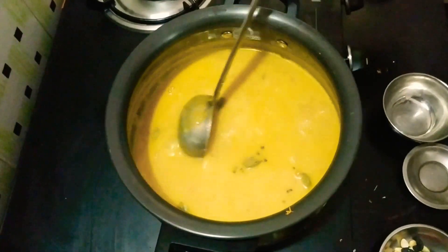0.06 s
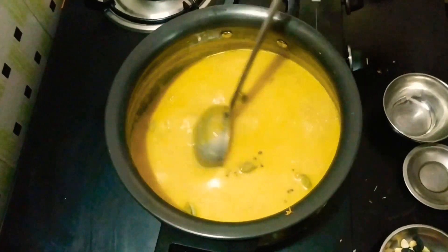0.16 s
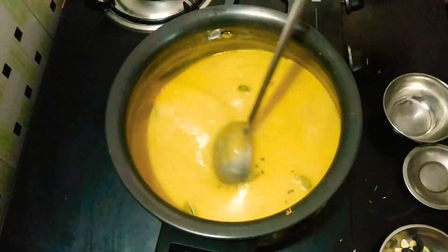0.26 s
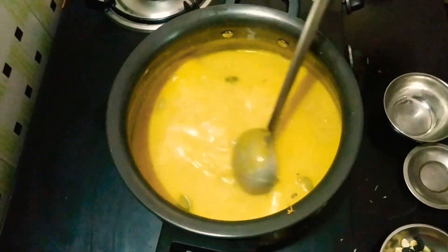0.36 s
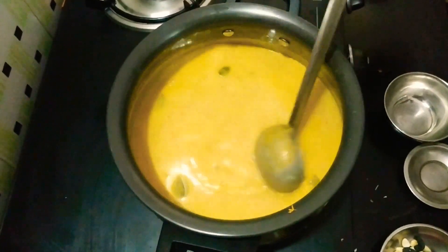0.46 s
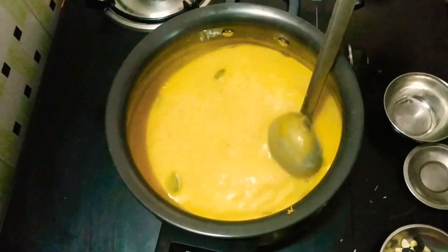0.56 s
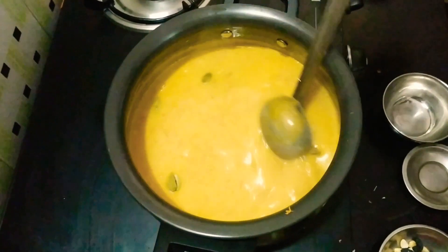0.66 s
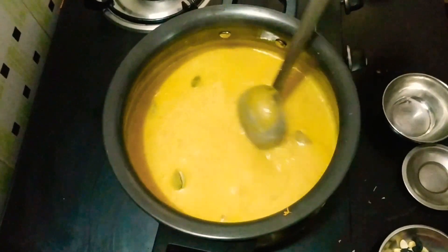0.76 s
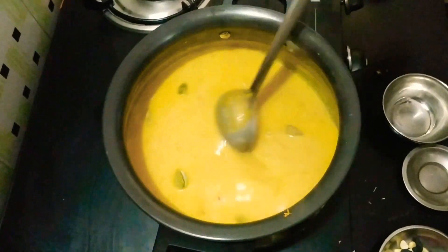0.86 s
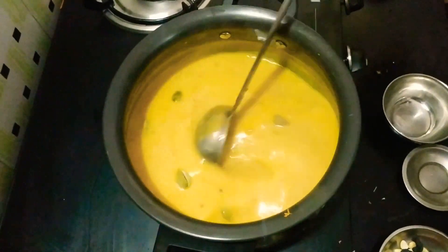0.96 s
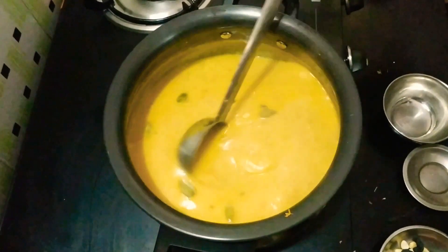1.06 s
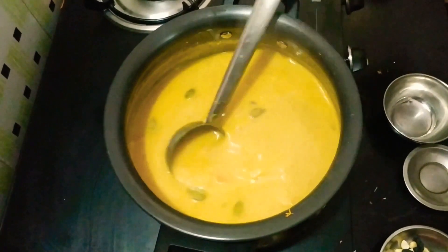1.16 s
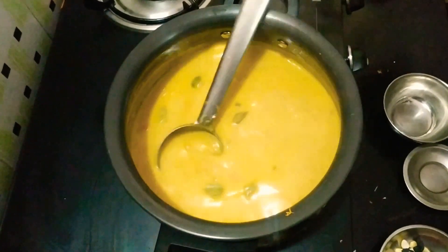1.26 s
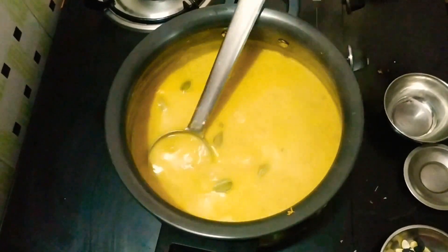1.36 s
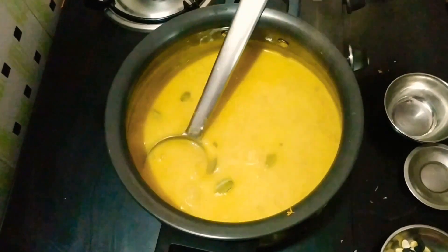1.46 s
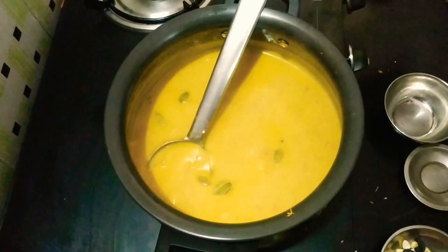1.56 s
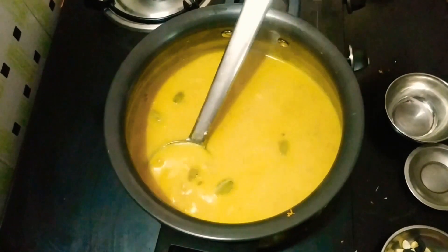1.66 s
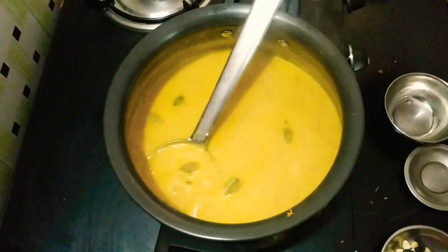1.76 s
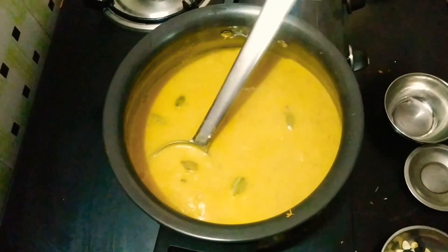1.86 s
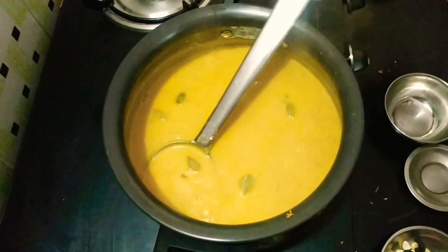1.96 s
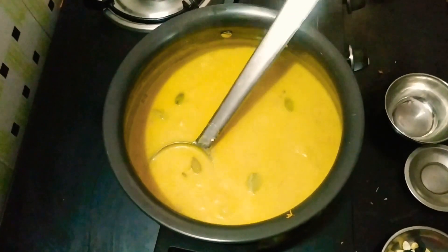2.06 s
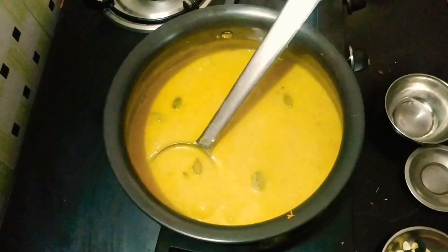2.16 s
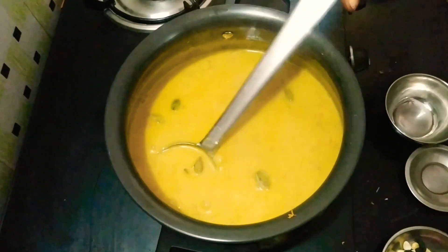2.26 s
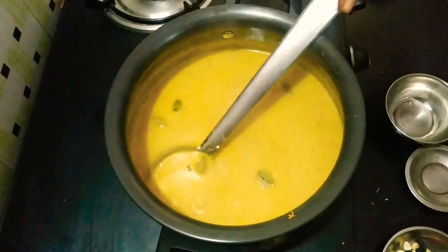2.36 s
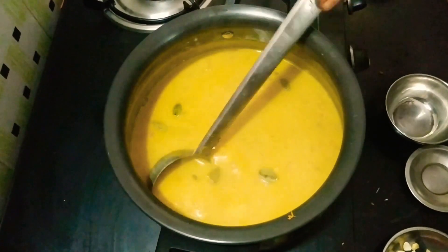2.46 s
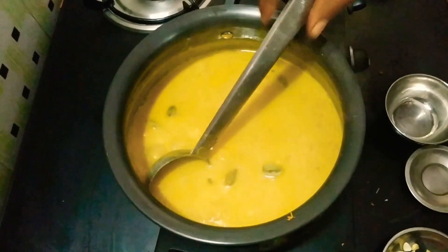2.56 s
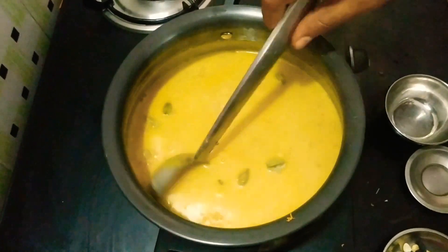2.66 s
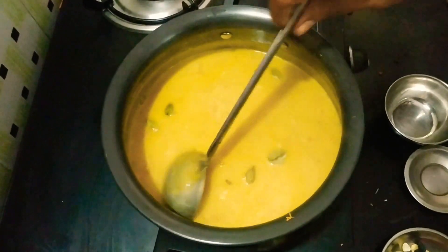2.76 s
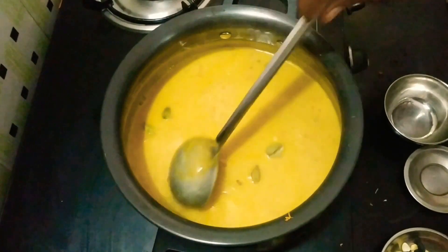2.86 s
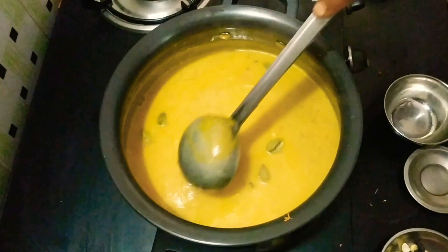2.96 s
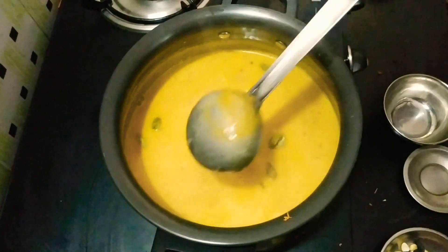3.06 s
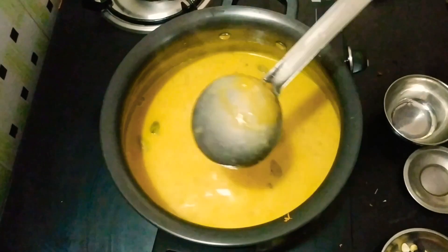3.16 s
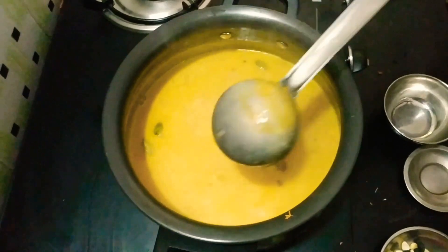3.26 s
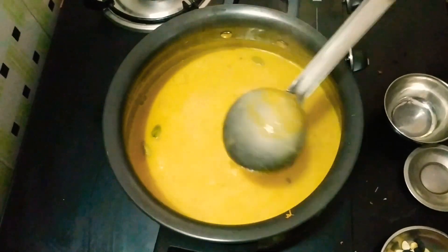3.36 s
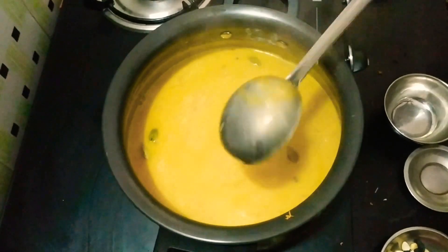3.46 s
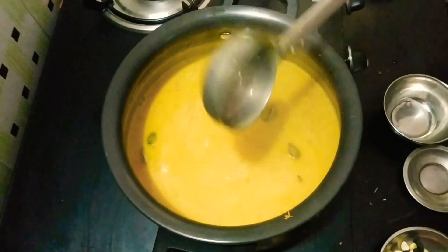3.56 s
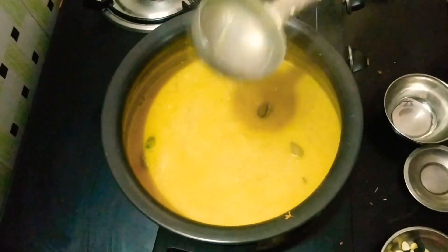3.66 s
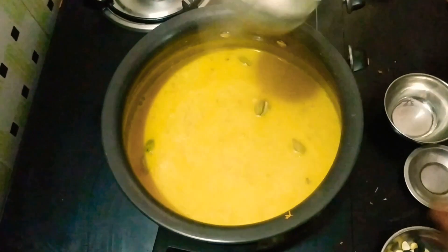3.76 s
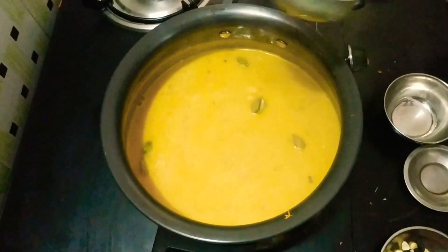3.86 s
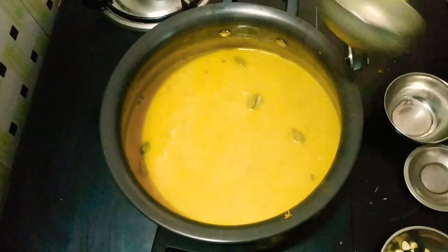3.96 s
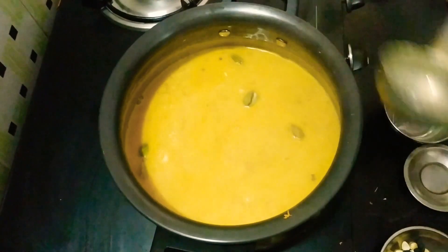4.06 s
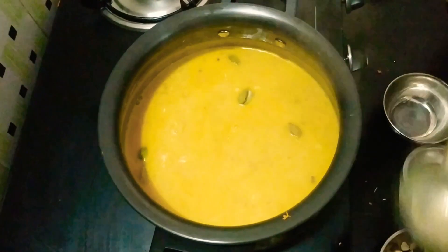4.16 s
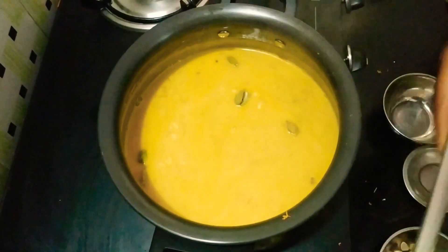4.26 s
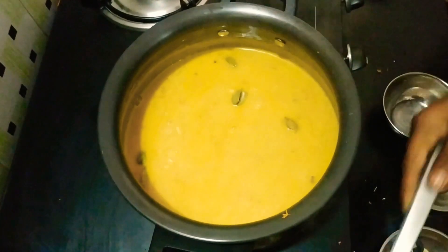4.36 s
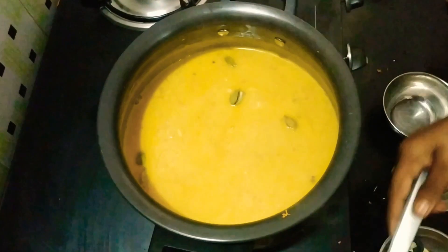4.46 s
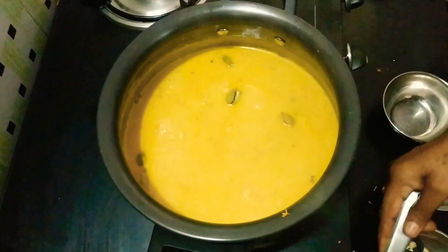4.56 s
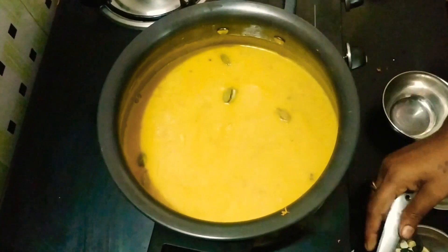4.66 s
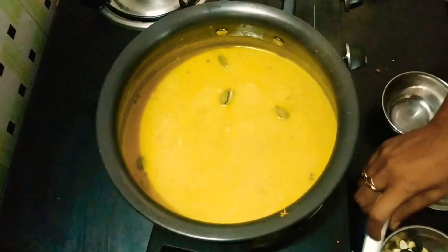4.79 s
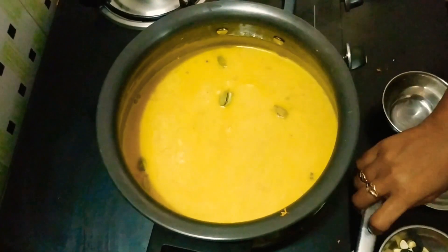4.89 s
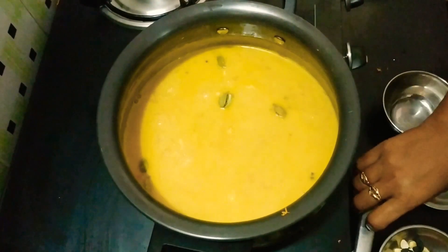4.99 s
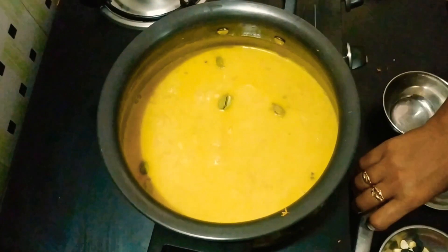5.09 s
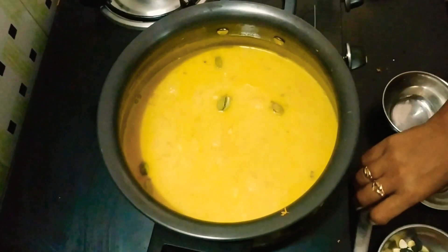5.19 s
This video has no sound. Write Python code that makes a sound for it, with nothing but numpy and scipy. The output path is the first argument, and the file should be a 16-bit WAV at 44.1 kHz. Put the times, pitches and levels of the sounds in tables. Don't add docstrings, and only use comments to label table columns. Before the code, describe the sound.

A steel ladle thumps and drags inside a full soup pot, clinks and grates on the rim, then clatters onto a kitchen counter.

```python
import sys
import numpy as np
from scipy import signal
from scipy.fft import rfft, irfft
from scipy.io import wavfile
from scipy.ndimage import uniform_filter1d

SR = 44100
rng = np.random.default_rng(int(sys.argv[2]) if len(sys.argv) > 2 else 0)


def transcribe(u):
    v = np.clip(np.atleast_2d(u).T, -1, 1)
    q = np.round(v * 32767).astype(np.int16)
    wavfile.write(sys.argv[1], SR, q)


def level_to_linear(level):
    exponent = np.asarray(level, float) / 20
    return 10 ** exponent


N = 230476

# start [s], level [dB], tick [dB], sharpness [0-1], wall wash [dB].
THUMP_BLOWS = [(0.005, -50, -64, 0.1, -80.5), (0.456, -33.5, -61, 0.51, -46), (0.535, -50, -45, 0.04, -47),
               (0.795, -31, -14.5, 0.98, -49), (0.829, -32, -50, 0.45, -31.5),
               (0.908, -35, -29.5, 0.92, -34.5), (0.925, -44.5, -61, 0.64, -68),
               (1.044, -50, -51, 0.4, -46.5), (1.101, -50.5, -56, 0.6, -52), (1.176, -48, -39, 0.44, -47.5),
               (1.259, -52, -48, 0.2, -51), (1.367, -33, -49, 0.62, -47.5), (1.41, -37, -51, 0.65, -47.5),
               (1.503, -33.5, -18, 0.77, -31), (1.522, -31.5, -26, 0.27, -32.5),
               (1.57, -34, -40, 0.57, -41), (2.726, -38.5, -26.5, 0.99, -39), (.803, -36, -60, 0.38, -57),
               (1.546, -42.5, -60, 0.14, -36), (1.6, -44, -60, 0.3, -48), (2.417, -54.5, -70, 0.25, -54),
               (2.449, -51.5, -70, 0.8, -56), (2.65, -53, -71, 0.37, -67), (2.733, -43, -62, 0.44, -64),
               (2.875, -62, -42, 0.96, -53)]
# frequency [Hz], level [dB], t60 [s].
COUNTER_MODES = [(209, 10, 0.12), (289, -7, 0.27), (380, 11, 0.056), (480, -23, 0.15), (690, -12, 0.097),
                 (970, 5.5, 0.018), (3610, 9.5, 0.031), (1610, 7, 0.016), (2340, 5, 0.054),
                 (3540, -18, 0.27)]


def evened(x):
    return x / np.sqrt(np.mean(x ** 2) + 1e-20)


def peaked(x):
    return x / abs(x).max()


def read(points, hz):
    f, value = np.transpose(points)
    return np.interp(np.log(hz + 1), np.log(f + 1), value)


def add(mix, s, sound):
    part = mix[:, round(s * SR):][:, :sound.shape[1]]
    part += sound[:, :part.shape[1]]


def above(x, hz):
    return signal.sosfilt(signal.butter(2, hz, "high", fs=SR, output="sos"), x)


def ring(modes, scatter_db=0, size=15000, wide=1):
    hz, db, t60 = np.transpose(modes)[:, :, None]
    t = np.arange(size) / SR
    level, phase, share = rng.standard_normal((3, len(hz), 1))
    apart = wide * np.minimum(hz / 1000, 1) ** 2
    swing = level_to_linear(db + scatter_db * level - 60 * t / np.clip(t60, .01, .7))
    ports = []
    for side in (1, -1):
        wave = np.sin(2 * np.pi * hz * t + side * 1.13 * apart * phase)
        ports.append((swing * level_to_linear(side * 2.6 * apart * share) * wave).sum(0))
    return np.array(ports)


def struck(body, contact_s):
    t = np.arange(SR // 20) / SR
    chatter = rng.standard_normal(len(t)) * t * np.exp(-t / contact_s)
    return peaked(signal.fftconvolve(body, chatter[None], axes=1))


def crack(decay_s, low_hz, high_hz, rise_s=0.00038):
    t = np.arange(SR // 8) / SR
    band = signal.butter(2, [low_hz, min(high_hz, .45 * SR)], "band", fs=SR, output="sos")
    noise = evened(signal.sosfilt(band, rng.standard_normal((2, len(t)))))
    return noise * np.exp(-t / decay_s) * np.minimum(t / rise_s, 1)


def span(strokes):
    return np.arange(max(strokes[0][0] - .15, 0), sum(strokes[-1][:2]) + .35, 1 / SR)


def effort(strokes, t, rise_db_s):
    s, hold, db, fall = np.transpose(strokes)[:, :, None]
    before = np.maximum(s - t, 0)
    after = np.maximum(t - s - hold, 0)
    return level_to_linear(db - rise_db_s * before - abs(fall) * after).sum(0)


def slips(count, per_s, spread_db):
    chance, size, sign = rng.random((3, count))
    clicks = (chance < per_s / SR) * level_to_linear(-spread_db * np.log(size + 0.0046))
    return evened(clicks * np.sign(sign - .5))


def rubbed(mix, strokes, peaks, per_s, spread_db, rise_db_s, split_hz=0, low=None, sag_per_s=0):
    t = span(strokes)
    force = slips(len(t), per_s, spread_db) * signal.windows.tukey(len(t), .05)
    modes = np.array([(hz, level + 10 * np.log10(width), np.log(1000) / np.pi / width)
                      for hz, width, level in peaks])
    hz = modes[:, 0]
    sag_under_hz = 2300 if sag_per_s else 0
    parts = [(hz >= split_hz, strokes, 0),
             ((hz < split_hz) & (hz >= sag_under_hz), low, 0),
             (hz < sag_under_hz, low, sag_per_s)]
    for part, rows, drop in parts:
        if not part.any():
            continue
        body = ring(modes[part], size=6000, wide=1 if hz[part].max() > 4500 else .5)
        body *= np.minimum(np.arange(6000) / 25, 1)
        drive = force * effort(rows, t, rise_db_s)
        sound = signal.fftconvolve(drive[None], body / np.linalg.norm(body) * np.sqrt(2), axes=1)
        clock = t[0] + np.arange(sound.shape[1]) / SR
        slowed = clock - drop / 2 * np.maximum(clock - rows[0][0], 0) ** 2
        add(mix, t[0], np.array([np.interp(slowed, clock, port) for port in sound]))


def brushed(mix, groups, colour, per_s, spread_db, rise_db_s):
    taps = np.fft.fftshift(irfft(level_to_linear(read(colour, np.fft.rfftfreq(512, 1 / SR)))))
    for strokes in groups:
        t = span(strokes)
        grit = np.array([slips(len(t), per_s, spread_db) for port in "LR"])
        grit = evened(signal.fftconvolve(grit, taps[None], "same", axes=1))
        add(mix, t[0], effort(strokes, t, rise_db_s) * grit)


def fine(low_hz, high_hz, width, db, count=70):
    place, size = rng.random((2, count))
    hz = low_hz + (high_hz - low_hz) * (np.arange(count) + place) / count
    return [(f, width, db - 10 * q) for f, q in zip(hz, size)]


def widened(peaks):
    return [(hz, max(width, 42), db + 10 * np.log10(max(width, 42) / 60)) for hz, width, db in peaks]


def room_hum():
    # frequency [Hz], density [dB per Hz].
    hum_colour = [(12, -31), (20, 1), (60, -22.5), (100, -10), (216, -26.5), (300, -20), (1200, -33),
                  (16000, -39)]
    # frequency [Hz], left-right likeness [-1 to 1].
    likeness = [(60, 0.96), (180, 0.99), (550, 0.81), (1650, -0.38), (4970, 0.13), (15000, -0.088)]
    # frequency [Hz], width [Hz], level [dB].
    room_tones = [
        (82.4, 5.9, -70),
        (182.5, 8.3, -72),
        (290.5, 8.5, -73.5),
        (384, 38, -78),
    ]
    # start [s], hold [s], level [dB], fall [dB per s].
    footfalls = [
        (2.428, 0.16, -46, 104),
        (4.4, 0.065, -46.5, 200),
        (5.038, 0.045, -36, 150),
    ]
    frames, hz = N // 512 + 5, np.fft.rfftfreq(2048, 1 / SR)[:, None]
    a, b, c, d, patches = rng.standard_normal((frames, 1025, 5)).T
    patches = evened(uniform_filter1d(uniform_filter1d(patches, 20, axis=0), 8, axis=1))
    same, left = np.clip(read(likeness, hz), -1, 1), a + 1j * b
    z = np.array([left, same * left + np.sqrt(1 - same ** 2) * (c + 1j * d)])

    def wave(size):
        return evened(signal.istft(z * size, nperseg=2048, noverlap=1536)[1][:, :N])

    noise = level_to_linear(-54.5) * wave(level_to_linear(read(hum_colour, hz) + patches))
    tones = [level_to_linear(db) * wave(1 / (1 + (2 * (hz - f) / width) ** 4)) for f, width, db in room_tones]
    blows = [(s + 0.021, 0, db - 16, 138) for s, db, *rest in THUMP_BLOWS]
    shake = level_to_linear(-50) + effort(blows + footfalls, np.arange(N) / SR, rise_db_s=193)
    return noise + tones[0] * shake * level_to_linear(54.0) + sum(tones[1:])


def steel_touches():
    # start [s], level [dB], first mode [Hz], second mode [Hz], tick [dB].
    touches = [(0.535, -80, 7960, 10500, -38.5), (2.7, -57, 2700, 3100, -74),
               (2.7249, -61, 7860, 10500, -33.5), (2.98, -57.5, 7880, 13640, -49),
               (3.391, -72, 9440, 14500, -53), (3.451, -81, 5000, 8200, -58), (3.699, -72, 3800, 2863, -61),
               (3.725, -65, 11600, 13400, -60.5), (3.757, -71.5, 7490, 6880, -69),
               (4.689, -71.5, 9770, 3710, -58.5), (4.87, -77, 7000, 8600, -57),
               (5.112, -74, 4430, 4420, -57.5), (0.002, -60.5, 10000, 7730, -58),
               (0.044, -67, 12100, 9440, -58)]
    lift_s, wet_t60, free_t60 = 3.42, 0.054, 1
    mix = np.zeros((2, N))
    for s, db, first_hz, second_hz, tick_db in touches:
        t60 = wet_t60 if s < lift_s else free_t60
        pairs = [(hz * split, 0, t60) for hz in (first_hz, second_hz) for split in (.994, 1.005)]
        body = ring(pairs, scatter_db=-2.0, size=10000, wide=0.66)
        add(mix, s, level_to_linear(db + 13.5) * struck(body, 0.004))
        add(mix, s, level_to_linear(tick_db) * crack(t60 / 12, 2800, 19000))
    return mix


def pot_thumps():
    # frequency [Hz], level [dB], t60 [s].
    pot_modes = [(85.5, -2, 0.8), (181.9, 3.5, 0.22), (222.6, -19, 0.98), (246.9, 0, 0.4), (289.8, 0, 0.13),
                 (349, -22, 0.2), (369.6, -1, 0.11), (444, -6.5, 0.13), (616, -2.5, 0.077),
                 (797, -17, 0.13), (1024, -12, 0.074), (1220, -22, 0.089), (1385, -2, 0.1),
                 (2150, -26, .08), (2700, -26, .08)]
    mix = np.zeros((2, N))
    for s, db, tick_db, sharp, wash_db in THUMP_BLOWS:
        push = signal.windows.hann(int(40 + 160 * (1 - np.clip(sharp, 0, 1))))
        thump = signal.fftconvolve(ring(pot_modes, scatter_db=1.9), push[None], axes=1)
        add(mix, s, level_to_linear(db + 4.0) * peaked(above(thump, 191)))
        add(mix, s, level_to_linear(tick_db - 1.5) * crack(0.00066, 720, 3620, rise_s=0.00047))
        wash = crack(0.024, 127, 2000)
        add(mix, s, level_to_linear(wash_db - 8.0) * (wash + 0.24 * wash[::-1]))
    return mix


def bottom_drag():
    # start [s], hold [s], level [dB], fall [dB per s].
    drags = [
        [(0.09, 0.009, -51.5, 81.5), (.19, 0.0088, -61.5, 80), (.31, 0.013, -59.5, 60),
         (0.534, 0.0013, -51, 151), (0.75, 0.072, -48, 58.3), (1.105, 0.0064, -54.5, 302),
         (1.15, 0.13, -66, 204), (1.378, 0.06, -62.5, 136)],
        [(2.4, 0.057, -60.5, 46.5), (2.7, 0.014, -64, 403), (2.784, 0.022, -61.5, 48.4)],
    ]
    # frequency [Hz], density [dB per Hz].
    drag_colour = [(880, -10), (1500, -6), (1610, -14), (2610, -2.5), (3480, -11.5), (5940, -12),
                   (14200, -19), (16000, -30)]
    mix = np.zeros((2, N))
    brushed(mix, drags, drag_colour, per_s=7000, spread_db=3.2, rise_db_s=132)
    return mix


def bottom_groans():
    # start [s], hold [s], level [dB], fall [dB per s].
    groans = [
        [(0.095, 0.018, -57.5, 60), (.2, 0.017, -60, 100), (.27, 0.034, -58.5, 120), (.378, .005, -66, 250)],
        [(0.812, 0.01, -49, 350), (.845, 0.018, -60, 300), (0.912, 0.0028, -49, 600)],
        [(2.845, 0.0098, -60, 200), (2.874, 0.014, -50.5, 250), (2.93, 0.019, -54.5, 200),
         (3.03, 0.033, -61, 160)],
    ]
    # frequency [Hz], width [Hz], level [dB].
    groan_modes = [
        [(854, 22, -1.5), (914, 19, -4), (998, 77, 3), (1047, 67, -1), (1195, 28, -8)],
        [(800, 90, -1), (1070, 120, -1), (1200, 140, 2), (1346, 55, 2), (1600, 110, -24)],
        [(526, 13, 2), (840, 230, -25), (990, 74, 15.5), (1154, 50, 13), (1250, 43, 10.5), (1416, 28, 17.5)],
    ]
    mix = np.zeros((2, N))
    for strokes, peaks in zip(groans, groan_modes):
        rubbed(mix, strokes, peaks, per_s=6000, spread_db=3, rise_db_s=450)
    return mix


def stand_sway():
    # start [s], level [dB], frequency [Hz], t60 [s].
    sways = [
        (0.839, -68, 85.5, .4),
        (0.916, -39, 95.3, 0.8),
        (1.005, -54, 95.2, 0.8),
        (1.402, -44.5, 76, 0.38),
    ]
    mix = np.zeros((2, N))
    for s, db, hz, t60 in sways:
        add(mix, s, level_to_linear(db) * struck(ring([(hz, 0, t60)]), 0.0024))
    return mix


def rim_clinks():
    # frequency [Hz], level [dB], t60 [s].
    handle_modes = [(2228, -8, 0.067), (2606, -9, .08), (4390, -18, 0.14), (4865, -17, .3),
                    (6470, -8.5, 0.092), (6660, -21, 0.18), (7180, -11, 0.14), (7400, -3, .07),
                    (7580, -7.5, 0.18), (7913, 3.5, 0.07), (8600, -2.5, 0.15), (9020, -11, .18),
                    (9220, -4, 0.11), (9920, -13, 0.1), (10000, 2, 0.055), (10740, -7.5, 0.15),
                    (12000, -8, 0.074), (13580, -7.5, 0.035), (14200, -18, .2)]
    # start [s], level [dB], crack [dB], freedom to ring [0-1].
    clinks = [(1.5472, -21, 15.5, 0.3), (1.5515, -22, 8, 0.55), (1.5955, -21, 15.5, 0.3),
              (1.5985, -15, -1, 0.43), (1.606, -19.5, 6, 0.68), (1.7328, -39, 20, 0.6),
              (1.7973, -27.5, 12.5, 1), (1.891, -32, 22.5, 0.6), (2.2522, -33, 12, 0.2),
              (2.2758, -31.5, 11, 0.6), (2.2898, -33, 4, 0.3), (2.316, -36.5, 16, 0.34)]
    mix = np.zeros((2, N))
    for s, db, crack_db, free in clinks:
        held = [(hz, level, min(t60, .25) * free) for hz, level, t60 in handle_modes]
        add(mix, s - .001, level_to_linear(db + 4.0) * struck(ring(held, scatter_db=2.0, size=8000), 0.0013))
        add(mix, s, level_to_linear(db + crack_db - 17.5) * crack(0.007, 2600, 13200, rise_s=0.0041))
    return mix


def scraping_grit(mix, strokes):
    # frequency [Hz], density [dB per Hz].
    grit_colour = [(2000, -19), (3300, -10.5), (4320, -11.5), (5120, -23), (6230, 0), (9790, -4.5),
                   (12800, -15), (15800, -17)]
    softer = [(s, hold, db - 4, fall) for s, hold, db, fall in strokes]
    brushed(mix, [softer], grit_colour, per_s=9000, spread_db=2.2, rise_db_s=503)


def rim_pull():
    # start [s], hold [s], level [dB], fall [dB per s].
    jerks = [
        (1.636, 0.0043, -42.5, 228),
        (1.7, .02, -49, 100),
        (1.738, 0.004, -52.5, 121),
        (1.804, 0.014, -39.5, 141),
        (1.851, .02, -48, 98),
        (1.893, 0.0055, -42.5, 147),
        (1.942, 0.0046, -45.5, 150),
        (2.0, 0.017, -54, 172),
    ]
    # start [s], hold [s], level [dB], fall [dB per s].
    pulls = [
        (1.68, 0.015, -52, 150),
        (1.73, 0.011, -48.5, 200),
        (1.79, .01, -53.5, 201.3),
        (1.825, 0.021, -50.5, 220),
        (1.885, .005, -54, 300),
        (1.94, 0.0096, -50.5, 260),
        (1.985, 0.0081, -59.5, 295),
        (2.025, 0.013, -57, 500),
        (2.055, 0.0057, -59, 600),
    ]
    # frequency [Hz], width [Hz], level [dB].
    rim_low = [(922, 49, -14), (1850, 67, -16.5), (2157, 62, 0), (2610, 48, -2), (2768, 78, 6),
               (2880, 80, -5)]
    rim_high = [(3800, 39, -7), (4380, 68, -6.5), (4870, 34, -6.5), (5470, 160, -7), (5720, 38, -13),
                (6240, 140, -0.5), (6730, 41, -7.5), (7330, 81, -2.5), (7590, 33, -4), (8070, 240, -1.5),
                (8580, 63, -2), (8880, 25, -6), (9210, 83, -9), (9440, 28, -19), (9920, 160, -3.5),
                (10500, 53, -19), (11020, 180, -10), (11200, 51, -11.5), (11500, 15, -19), (11800, 37, -14),
                (12100, 62, -6), (12300, 17, -16), (12900, 65, -17), (13200, 120, -23), (13600, 35, -18),
                (13700, 29, -15), (14360, 320, -13), (15000, 41, -18), (15300, 63, -13), (15700, 33, -18)]
    rim_grain = [(1530, 780, -20), (3130, 27, -21), (3540, 350, -30), (3990, 70, -20), (7050, 220, -3)]
    mix = np.zeros((2, N))
    peaks = rim_low + widened(rim_high) + rim_grain + fine(5850, 12500, 82, db=-14.5)
    rubbed(mix, jerks, peaks, per_s=1500, spread_db=0.63, rise_db_s=390,
           split_hz=3300, low=pulls, sag_per_s=.13)
    scraping_grit(mix, jerks)
    return mix


def wall_turn():
    # start [s], hold [s], level [dB], fall [dB per s].
    turns = [
        (2.254, 0.006, -46, 202),
        (2.277, 0.021, -40.5, 400),
        (2.318, 0.0099, -50, 300),
        (2.38, 0.013, -57.5, 88),
    ]
    # start [s], hold [s], level [dB], fall [dB per s].
    low_turns = [
        (2.258, 0.029, -45.5, 256),
    ]
    # frequency [Hz], width [Hz], level [dB].
    wall_low = [(2030, 77, -14), (2800, 170, -3)]
    wall_high = [(4550, 130, -5.5), (5300, 27, -17), (5460, 56, -16), (5860, 40, -3), (6170, 41, -10),
                 (6640, 27, 4), (7270, 34, -3), (7380, 36, -5), (7100, 22, -8), (8300, 26, 4.5),
                 (8830, 62, -9), (8860, 27, -3), (9200, 36, -6), (9820, 56, -1.5), (10500, 64, -12),
                 (10900, 35, -12), (12000, 130, -7), (12540, 56, -3), (13200, 48, -15), (14050, 200, -9),
                 (14800, 70, -35), (15700, 29, -18)]
    wall_grain = [(1150, 540, -18.5), (1930, 300, -9.5), (2660, 280, -3), (3200, 640, -20),
                  (3800, 690, -29), (5000, 750, -27), (10940, 1200, -13)]
    mix = np.zeros((2, N))
    peaks = wall_low + widened(wall_high) + wall_grain + fine(4485, 15500, 70, db=-14)
    rubbed(mix, turns, peaks, per_s=2500, spread_db=2.0, rise_db_s=1004, split_hz=4100, low=low_turns)
    scraping_grit(mix, turns)
    return mix


def sleeve_rustle():
    # start [s], hold [s], level [dB], fall [dB per s].
    rustles = [
        [(3.424, .01, -67, 80), (3.72, .01, -95, 39.7), (3.97, 0.47, -66.5, 130)],
        [(4.629, .005, -55.5, 85)],
    ]
    # frequency [Hz], density [dB per Hz].
    rustle_colour = [(530, -48), (900, -24), (1850, -14), (3430, -18), (4200, -20), (5890, -32),
                     (16000, -30)]
    mix = np.zeros((2, N))
    brushed(mix, rustles, rustle_colour, per_s=6500, spread_db=4.5, rise_db_s=400)
    return mix


def ladle_set_down():
    # start [s], level [dB], tick [dB].
    knocks = [
        (4.6, -38.5, -42),
        (4.607, -34, -32),
        (4.6099, -28.5, -50),
    ]
    mix = np.zeros((2, N))
    for s, db, tick_db in knocks:
        add(mix, s, level_to_linear(db) * peaked(uniform_filter1d(ring(COUNTER_MODES, wide=.3), size=3)))
        add(mix, s, level_to_linear(db - 11.0) * crack(0.0086, 280, 2500))
        add(mix, s, level_to_linear(tick_db) * crack(0.0015, 1300, 20000))
    return mix


def bowl_singing():
    # start [s], level [dB], frequency [Hz], t60 [s], swell [s].
    songs = [
        (4.609, -44, 2512, 0.15, 0.008),
        (4.705, -62, 2500, .4, .01),
        (4.63, -58, 3570, .4, .02),
        (4.70, -58, 3670, .3, .015),
    ]
    mix = np.zeros((2, N))
    t = np.arange(SR // 2) / SR
    for s, db, hz, t60, swell_s in songs:
        swing = level_to_linear(db - 60 * t / t60 + [[1], [-1]]) * (1 - np.exp(-t / swell_s))
        add(mix, s, swing * np.sin(2 * np.pi * hz * t))
    return mix


def ladle_clatter():
    # frequency [Hz], level [dB], t60 [s].
    ladle_modes = [(1910, -7, 0.018), (2463, -8, 0.078), (2747, 1.5, 0.057), (3230, 0, 0.036),
                   (3510, -3.5, .04), (4430, 2, 0.039), (4930, -4, 0.11), (5800, -15, .05), (6070, 0, .06),
                   (6400, -10, .06), (7030, -1, 0.035), (7390, 11.5, 0.028), (7960, 4, .035),
                   (8763, 6, 0.086), (9940, -1, 0.06), (10000, -5, 0.045), (11000, -5, 0.057),
                   (11850, -4, .045), (12400, -20, 0.074), (13200, -17, .08), (14400, -14, .08),
                   (14400, -15, .04), (16120, -2, .08)]
    # start [s], level [dB], crack [dB], thud [dB], brightness [dB per octave].
    bounces = [
        (5.1716, -22.5, -12, -54, 2),
        (5.1745, -16.5, 4.5, -29.5, -5),
        (5.1855, -28, -2, -60, -9),
        (5.1911, -4.5, 0, -64, 9),
        (5.1951, -7, -10, -34, -0.5),
        (5.2032, -13.5, 7.5, -43, 6),
        (5.2072, -9.5, -2, -34, -17),
        (5.2099, -6.5, 2, -24, -9),
        (5.215, -14, -3, -23, 1),
        (5.2235, -8, -14, -32, 1),
    ]
    mix = np.zeros((2, N))
    for s, db, crack_db, thud_db, bright_db in bounces:
        loose = [(hz, level + bright_db * np.log2(hz / 5000), t60) for hz, level, t60 in ladle_modes]
        add(mix, s, level_to_linear(db - 2.5) * above(struck(ring(loose, scatter_db=1.6, size=4000), 0.00088), 1500))
        add(mix, s, level_to_linear(db + crack_db - 9.0) * crack(0.0039, 2430, 14300, rise_s=0.00062))
        add(mix, s, level_to_linear(thud_db) * above(struck(ring(COUNTER_MODES, size=4000), 0.0017), 274))
    return mix


def kitchen_echoes(x):
    # frequency [Hz], t60 [s].
    kitchen_t60 = [(200, 0.62), (1000, 0.58), (1500, .3), (2200, 0.23), (4000, 0.22), (12000, 0.23)]
    taps = np.zeros((2, SR // 2))
    at = np.arange(100, SR // 2 - 20, 20) + rng.integers(0, 20, (2, (SR // 2 - 101) // 20))
    np.put_along_axis(taps, at, rng.choice([-1., 1.], at.shape), 1)
    hz, t, z = signal.stft(taps, SR, nperseg=256)
    decay = level_to_linear(-60 * t / read(kitchen_t60, hz)[:, None])
    tail = signal.istft(z * decay, SR, nperseg=256)[1]
    shared = np.clip(1 - (np.fft.rfftfreq(tail.shape[1], 1 / SR) / 900) ** 2, 0, 1)
    left, right = rfft(tail)
    tail = irfft([left, shared * left + np.sqrt(1 - shared ** 2) * right], tail.shape[1])
    return signal.fftconvolve(x, tail / np.linalg.norm(tail[0]), axes=1)[:, :N]


def scene():
    hum = room_hum()
    steel = steel_touches() + pot_thumps() + bottom_drag() + bottom_groans() + stand_sway()
    steel += above(rim_clinks() + rim_pull() + wall_turn(), 400)
    steel += sleeve_rustle() + ladle_set_down() + bowl_singing() + ladle_clatter()
    return steel + level_to_linear(-6.5) * kitchen_echoes(steel) + hum


def masked(x, margin_db, whole_db, waver_db):
    hz, t, z = signal.stft(x, SR, "cosine", nperseg=2048, noverlap=1024)
    power = (abs(z) ** 2).sum(0) + 1e-20
    strip = uniform_filter1d(power, size=7, axis=0)
    around = uniform_filter1d(power, size=80, axis=0)
    waver = uniform_filter1d(rng.standard_normal(power.shape), size=9, axis=0)
    waver = evened(uniform_filter1d(waver, size=3, axis=1))
    limit = around * level_to_linear(-2 * margin_db) + power[100:].mean(0) * level_to_linear(2 * whole_db)
    limit = limit * level_to_linear(2 * waver_db * waver)
    keep = 1 / (1 + np.minimum(limit / abs(strip), 30) ** 8)
    keep[hz < 2300] = 1
    treble = power[100:].sum(0)
    sudden = treble > 60 * np.minimum(np.roll(treble, 1), np.roll(treble, 2))
    keep[:, sudden] = 1
    return signal.istft(z * keep, SR, "cosine", nperseg=2048, noverlap=1024)[1][:, :N]


def roll_off(x):
    return signal.sosfilt(signal.butter(12, 15800, fs=SR, output="sos"), x)


def record(dry):
    # frequency [Hz], left over right [dB].
    port_lean = [(60, -1), (150, -2.5), (380, -1), (950, -2.5), (2380, 4.5), (5980, 0.5), (15000, 0)]
    hz = np.fft.rfftfreq(N, 1 / SR)
    lean = level_to_linear(np.outer([.5, -.5], read(port_lean, hz))) * (hz < 15850)
    heard = irfft(rfft(dry) * lean, N)
    thinned = masked(heard, margin_db=3.0, whole_db=-16, waver_db=4.6)
    return roll_off(thinned)


dry = scene()
out = record(dry)
transcribe(out)
```